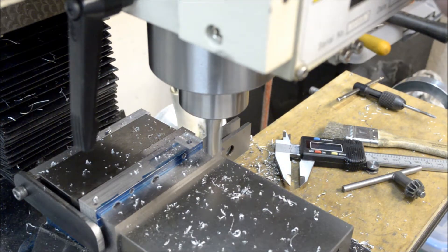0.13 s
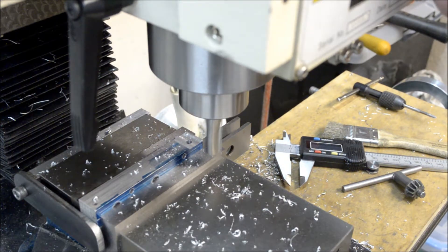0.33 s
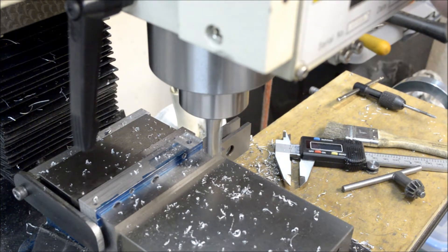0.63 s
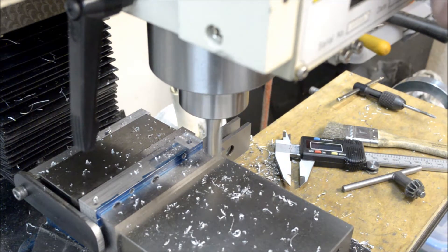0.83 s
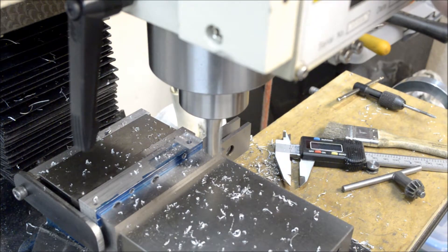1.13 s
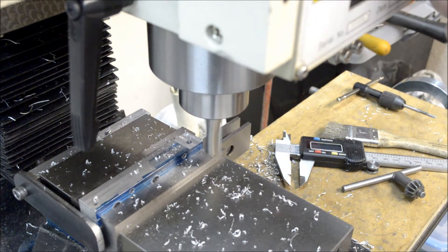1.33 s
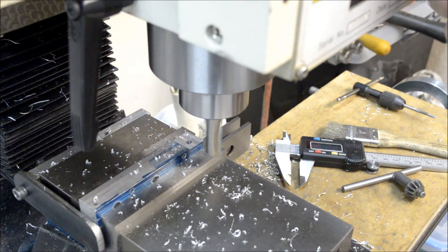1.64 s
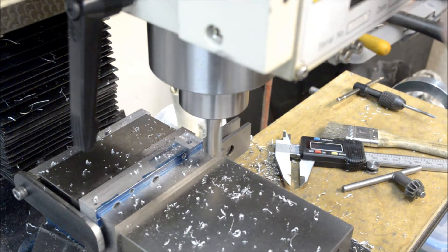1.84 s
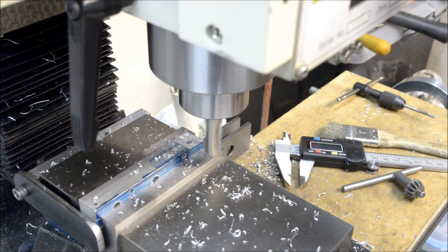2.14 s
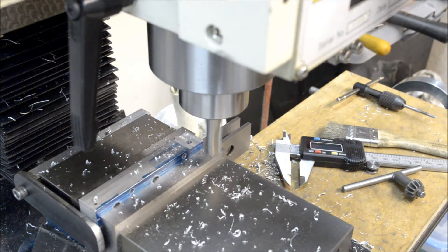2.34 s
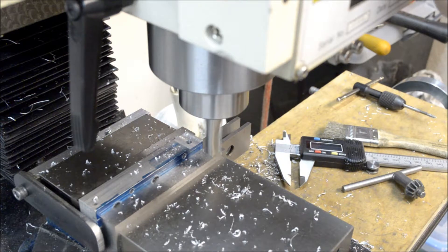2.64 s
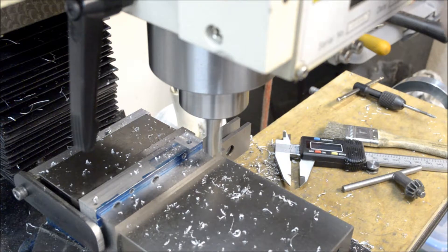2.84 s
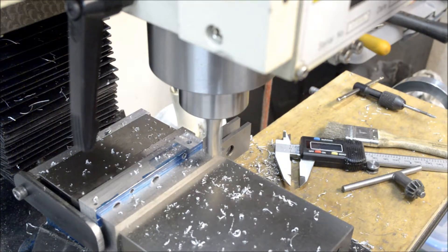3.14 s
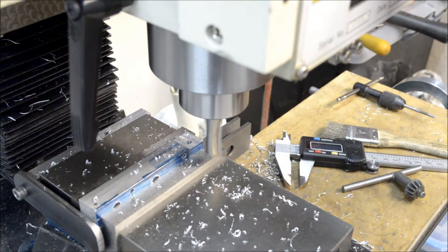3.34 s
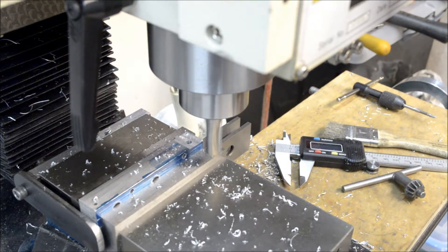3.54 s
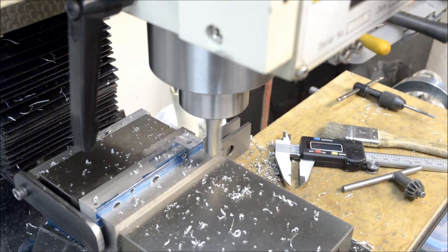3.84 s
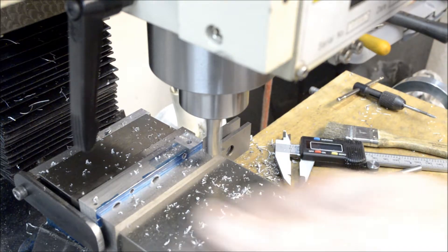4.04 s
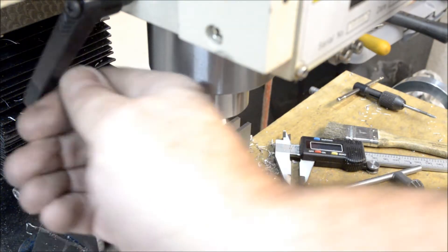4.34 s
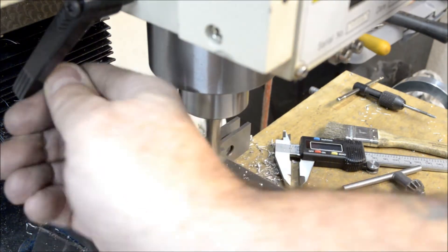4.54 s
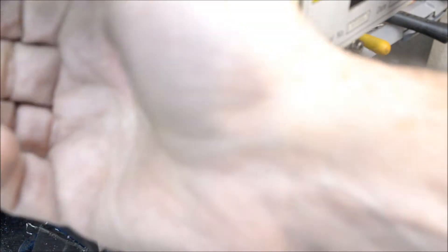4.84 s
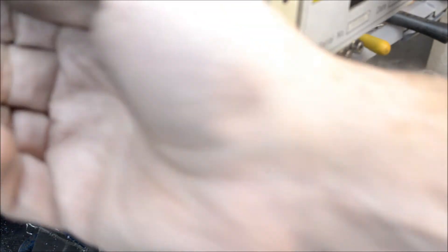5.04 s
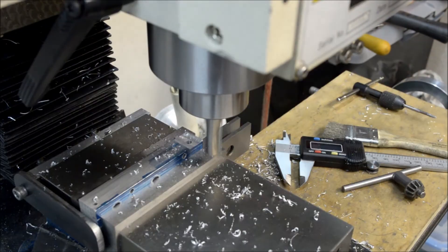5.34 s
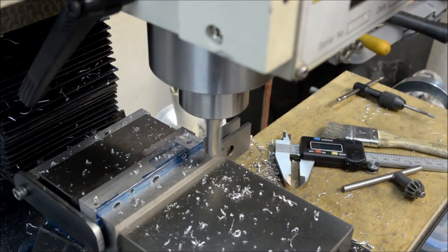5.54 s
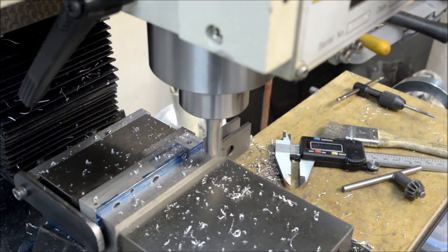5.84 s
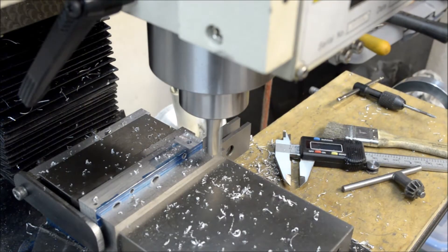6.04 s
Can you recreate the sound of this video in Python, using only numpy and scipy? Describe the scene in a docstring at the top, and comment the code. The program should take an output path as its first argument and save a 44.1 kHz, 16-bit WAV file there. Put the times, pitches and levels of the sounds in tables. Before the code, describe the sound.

Close, continuous gear whine and gritty metal cutting over mains hum, a few sharp clicks, then the spindle speeds up and grows louder.

```python
"""A small geared milling machine cuts a slot in metal, close by, in a workshop.
From the start its gears whine on multiples of the spindle speed over the motor's mains hum, while scraping,
chips and tooth knocks shake the iron head. A pinion chatters and the cutter bites once a turn.
Brief rasps ring narrow bands throughout; before five seconds the first sharp metal ticks ring out.
Just after five seconds the speed is turned up: the gear pitches climb and the cut grows louder."""
import sys
import numpy as np
from scipy import signal
from scipy.fft import rfft, irfft
from scipy.io import wavfile

SR = 44100
rng = np.random.default_rng(int(sys.argv[2]) if len(sys.argv) > 2 else 0)


def dump(signal):
    """Clip the signal to [-1, 1] and save it as 16-bit WAV at the path in sys.argv[1]."""
    limited = np.clip(np.atleast_2d(signal).T, -1, 1)
    pcm = np.round(limited * 32767).astype(np.int16)
    wavfile.write(sys.argv[1], SR, pcm)


N = 272961
TIME = np.arange(N) / SR  # s

# The spindle runs steadily until the knob is turned, then eases toward the new setting
SLOW_TURNS_PER_S, FAST_TURNS_PER_S = 12.537, 14.6
KNOB_S, SPIN_UP_S = 5.03, 0.74  # start and time constant of the rise
LOAD_DB_PER_TURN_PER_S = 1.18  # gears rattle and the cutter bites harder with speed
RUMBLE_TOP_HZ = 450  # the rumble below stays the same at any speed

# The four strongest gear tones: cycles_per_turn
MESH_ORDERS = (62, 59.22, 111, 107)
# Each strong tone swells and fades as its pitch slides through resonances of the head:
# level_db away from them, then a list of (centre_hz, width_hz, lift_db)
MESH_RESONANCES = [(-41.6, [(804, 18, 6), (823, 18, -12), (843, 16, -4.5), (872, 20, 2)]),
                   (-72, [(774, 14, 7), (787, 12, -9), (814, 92, 37.5), (816, 7, -2.5), (828, 11, 2),
                   (839, 6, -2)]), (-49, [(1472, 32, 13), (1500, 11, 9), (1521, 21, 16.5), (1550, 18, 14.5),
                   (1569, 9, 11)]), (-46.7, [(1452, 22, 4.5), (1502, 9, 10.5), (1512, 7, 11)])]
# Backlash makes the strong tones waver: cycles rms, share of level rms
MESH_PHASE_WAVER, MESH_LEVEL_WAVER = .01, .1
# Weaker gear tones and sidebands: cycles_per_turn, slow_db, fast_db (at the highest speed reached)
GEAR_TONES = [(16, -77, -77), (24, -68, -74), (25, -63, -70), (29, -66, -76), (37, -58, -50),
              (45.3, -64, -68), (48.8, -62, -66), (50, -70, -60), (54, -63, -68), (57, -69, -53),
              (60, -58, -58), (63, -50, -52), (63.5, -58, -64), (64.46, -55, -60), (65.3, -55, -58),
              (66.23, -60, -62), (67, -56, -63), (68.22, -55, -62), (68.8, -56, -63), (69.4, -59, -62),
              (70.73, -53, -60), (75, -68, -53), (79, -68, -58), (83.52, -53, -68), (88.82, -54, -63),
              (93, -62, -48), (101, -55, -57), (101.66, -53, -55), (103, -57, -60), (104, -57, -60),
              (106, -54, -55), (109, -55, -62), (110, -52, -55), (112, -64, -50), (116.58, -58, -62),
              (118.43, -48, -53), (120, -49, -58), (120.61, -53, -60), (121, -55, -60), (121.57, -57, -62),
              (122, -56, -61), (124, -59, -56), (125.15, -54, -52), (127, -56, -56), (128.87, -57, -62),
              (134.24, -54, -60), (135.37, -56, -58), (136.12, -54, -62), (138, -51, -52), (147, -55, -53),
              (152.36, -53, -61), (158, -58, -60), (161.5, -57, -60), (220, -57, -56), (226, -56, -55),
              (245, -56, -56), (307.4, -56, -57)]

# Motor hum on multiples of the mains: pitch_hz, level_db
HUM = [(120, -64.5), (240, -72), (360, -67), (480, -59), (1680, -49.5), (1800, -63), (2100, -69),
       (2160, -55)]

# Broad colour of the machine: pitch_hz, level_db (relative)
COLOUR = [(20, -59), (60, -33.5), (110, -35.5), (165, -34), (300, -29.5), (640, -21.5), (900, -13),
          (1150, -19), (1500, -18), (2000, -15), (4700, -20), (6000, -29), (8500, -28), (10000, -42.5),
          (14600, -56.5)]
# Resonances and hollows of head, vice and table: centre_hz, width_hz, lift_db above the broad colour
BODY = [(340, 40, -3), (528, 22, 3), (607, 20, 4), (800, 76, 8), (865, 31, 4.5), (1039, 38, 5),
        (1267, 41, 8), (1363, 120, 9), (1414, 29, -6), (1497, 78, 10), (1589, 52, 5.5), (1713, 64, 6),
        (1780, 40, -3), (1969, 150, 5.8), (2393, 340, -2.5), (2812, 130, 7.5), (2956, 63, 7.5),
        (3073, 48, 6), (3151, 72, 3.3), (3835, 175, 5), (4026, 39, -5), (4089, 195, 3), (4264, 94, -3),
        (5307, 65, -6), (5724, 250, -12), (6379, 120, 4.5), (6892, 112, -13), (7120, 160, 3),
        (8024, 135, 3), (8587, 220, 5), (11800, 1100, 2.5)]

# A small pinion chatters tooth by tooth and binds at one spot: teeth, turns, turns
PINION_TEETH, TIGHT_ANGLE, TIGHT_WIDTH = 14, .89, .2
CHATTER_DB, TIGHT_LIFT_DB, BACKLASH_S = -42, 4.5, .0004  # levels at low speed; timing scatter rms
CHATTER_HZ, CHATTER_WIDTH_HZ = 1520, 650

# Where in each turn the proudest flute enters and drags, and for how long (turns)
ENTRY_ANGLE, DRAG_ANGLE, DRAG_WIDTH = .5, .74, .26
ENTRY_DB, ENTRY_HZ, ENTRY_WIDTH_HZ, ENTRY_T60_S = -57, 7500, 2000, .03  # level at low speed
DRAG_DB, DRAG_HZ, DRAG_WIDTH_HZ = -48, 2946, 700  # level at low speed

# Brief catches of the cutter, and two bursts of gear chatter (1.21 s and 1.35 s): middle_s, peak_rms_db,
# ring_hz
RASPS = [(.061, -38, 2842), (1.21, -39, 1980), (1.268, -39.5, 2870), (1.35, -33, 1360), (1.499, -40, 2900),
         (2.379, -40.5, 2800), (3.89, -37.5, 2836), (5.625, -34.5, 2788), (5.846, -38, 2785),
         (6.06, -39.5, 2770), (6.134, -39, 2800)]
RASP_S, RASP_WIDTH_HZ = .05, 170

# Sharp ticks of metal: start_s, level_db (rms of the first 3 ms), ring_hz, ring_width_hz, t60_s,
# crack_db (bright crack against the ring)
TICKS = [(4.6553, -32, 4450, 1100, .014, -32), (4.6725, -34.5, 4600, 1100, .03, -26),
         (4.688, -39, 4600, 900, .02, -32), (4.8256, -30.5, 6200, 1300, .009, -6),
         (5.7255, -31, 3700, 1500, .06, -15), (5.751, -36, 3700, 1100, .03, -25),
         (5.823, -35, 3900, 1400, .03, -30), (6.0948, -35.5, 9250, 800, .07, -10)]

EDGE_HZ = 14800  # upper limit of the whole sound


def gain_of(db):
    """Logarithmic level: decibels become an amplitude ratio."""
    return 10 ** (np.asarray(db) / 20)


def evened(x):
    """Normalisation: the signal is scaled to rms 1."""
    return x / np.sqrt(np.mean(x ** 2) + 1e-20)


def drift(per_s):
    """Low-pass noise: smooth chance variation of about rms 1, up to the given rate."""
    step = 32  # samples between the slow values
    hz = np.fft.rfftfreq(N // step, step / SR)
    spectrum = rfft(rng.standard_normal(N // step)) / np.sqrt(1 + (hz / per_s) ** 4)
    slow = irfft(spectrum)
    return np.interp(TIME, np.arange(len(slow)) * step / SR, evened(slow))


def lift_db(resonances, hz):
    """Resonance: each bell-shaped peak or hollow adds its decibels at the given pitches."""
    return sum(lift * 2 ** -((2 * (hz - centre) / width) ** 2) for centre, width, lift in resonances)


def band(x, hz, width_hz):
    """Band-pass resonance: one band is kept and rings on after each blow."""
    edges = [max(hz - width_hz / 2, 50), min(hz + width_hz / 2, SR / 2 - 50)]
    return signal.lfilter(*signal.butter(2, edges, "band", fs=SR), x)


def near(turns, angle, width):
    """Periodic window: a bell that reaches 1 whenever the spindle passes the given angle."""
    offset = (turns - angle + .5) % 1 - .5
    return 2 ** -((2 * offset / width) ** 2)


def passes(cycles):
    """Phase crossing: the samples at which a new cycle begins."""
    return np.flatnonzero(np.diff(np.floor(cycles)) > 0)


def ring_body(x):
    """Minimum-phase filtering: a force excites the resonances, which ring on after each blow."""
    size = 8192
    hz = np.fft.rfftfreq(size, 1 / SR)
    points, level = np.transpose(COLOUR)
    db = np.interp(np.log(hz + 1), np.log(points), level) + lift_db(BODY, hz)
    log_gain = np.log(gain_of(np.r_[db, db[-2:0:-1]]))
    # the Hilbert transform of the log gain gives the minimum phase
    response = np.fft.ifft(np.exp(np.conj(signal.hilbert(log_gain)))).real
    return signal.oaconvolve(x, response[:size // 2])[:N]


def spindle_speed():
    """First-order response: steady turns per second, then an exponential approach to a faster setting."""
    eased = 1 - np.exp(-np.maximum(TIME - KNOB_S, 0) / SPIN_UP_S)
    return SLOW_TURNS_PER_S + (FAST_TURNS_PER_S - SLOW_TURNS_PER_S) * eased


def spindle_turns():
    """Integration of speed: the angle of the spindle in turns."""
    return np.cumsum(spindle_speed()) / SR


def load_gain():
    """Load: forces grow with speed, as a gain relative to low speed."""
    return gain_of(LOAD_DB_PER_TURN_PER_S * (spindle_speed() - SLOW_TURNS_PER_S))


def gear_whine(turns):
    """Order locking: meshing tones follow the spindle; backlash makes level and phase waver."""
    speed = spindle_speed()
    fast = ((speed - speed.min()) / np.ptp(speed)) ** 2
    whine = np.zeros(N)
    for order, (db, resonances) in zip(MESH_ORDERS, MESH_RESONANCES):
        phase = order * turns + rng.random() + MESH_PHASE_WAVER * drift(10.0)
        level = gain_of(db + lift_db(resonances, order * speed))
        level = level * (1 + MESH_LEVEL_WAVER * drift(30))
        whine += level * np.cos(2 * np.pi * phase)
    for order, slow_db, fast_db in GEAR_TONES:
        phase = order * turns + rng.random() + .035 * drift(4)
        level = gain_of(slow_db + fast * (fast_db - slow_db)) * (1 + .15 * drift(10))
        whine += level * np.cos(2 * np.pi * phase)
    return np.sqrt(2) * whine  # makes the levels rms


def motor_hum(waver=0.12):
    """Mains harmonics: the rectified supply makes the motor buzz at pitches that ignore its speed."""
    hum = np.zeros(N)
    for hz, db in HUM:
        level = gain_of(db) * (1 + waver * drift(3.2))
        hum += level * np.cos(2 * np.pi * (hz * TIME + rng.random()))
    return np.sqrt(2) * hum  # makes the levels rms


def tooth_knocks(turns, count=900, uneven=0.28, top_hz=1200):
    """Cyclic impacts: tooth flaws knock at the same angles every turn, never quite equally hard."""
    place = (np.arange(count) + rng.random(count)) / count
    sign = rng.choice([-1, 1], count)
    angles = np.arange(int(turns[-1]) + 1)[:, None] + place
    force = sign * (1 + uneven * rng.standard_normal(angles.shape))
    within = angles < turns[-1]
    knocks = np.bincount(np.searchsorted(turns, angles[within]), force[within], N)
    return evened(signal.lfilter(*signal.butter(1, top_hz, fs=SR), knocks))


def cutting(turns, level_db=-33.5, chip_db=-5, chips_per_s=2400, unrest_db=0.41):
    """Forced vibration: scraping, breaking chips and tooth knocks shake the machine; load spares the rumble."""
    scrape = rng.standard_normal(N)
    breaks = rng.standard_normal(N) * (rng.random(N) < chips_per_s / SR)
    chips = gain_of(chip_db) * evened(breaks)
    knocks = gain_of(-10.5) * tooth_knocks(turns)
    force = (scrape + chips + knocks) * gain_of(unrest_db * drift(22))
    shaken = evened(ring_body(force))
    rumble = signal.sosfiltfilt(signal.butter(2, RUMBLE_TOP_HZ, fs=SR, output="sos"), shaken)
    return gain_of(level_db) * (rumble + load_gain() * (shaken - rumble))


def pinion_chatter(turns, uneven=0.25):
    """Impact excitation: pinion teeth strike the head, a little early or late, hardest at the tight spot."""
    at = passes(PINION_TEETH * turns - .5)
    late, hard = rng.standard_normal((len(at), 2)).T
    tightness = near(turns[at], TIGHT_ANGLE, TIGHT_WIDTH)
    force = gain_of(TIGHT_LIFT_DB * tightness) * (1 + uneven * hard)
    struck = at + np.round(late * BACKLASH_S * SR).astype(int)
    blows = np.bincount(np.clip(struck, 0, N - 1), force, N)
    chatter = evened(ring_body(band(blows, CHATTER_HZ, CHATTER_WIDTH_HZ)))
    return gain_of(CHATTER_DB) * load_gain() * chatter


def cutter_bites(turns, uneven_db=1):
    """Periodic friction: once a turn the proudest flute clicks into the metal, then drags through it."""
    entry = np.zeros(N)
    entry[passes(turns - ENTRY_ANGLE)] = 1
    contact = signal.lfilter([1], [1, -np.exp(-np.log(1000) / (ENTRY_T60_S * SR))], entry)
    hiss = evened(band(rng.standard_normal(N), ENTRY_HZ, ENTRY_WIDTH_HZ))
    click = gain_of(ENTRY_DB) * contact * hiss
    scrape = rng.standard_normal(N) * near(turns, DRAG_ANGLE, DRAG_WIDTH)
    scrape = scrape * gain_of(uneven_db * drift(7.5))
    drag = gain_of(DRAG_DB) * evened(ring_body(band(scrape, DRAG_HZ, DRAG_WIDTH_HZ)))
    return load_gain() * (click + drag)


def rasps():
    """Friction at resonance: a tooth drags on a chip, or the gears chatter briefly, and a swell of scraping
    rings one narrow band."""
    out = np.zeros(N)
    swell = np.hanning(round(RASP_S * SR))
    hz = np.fft.rfftfreq(len(swell), 1 / SR)
    for middle_s, db, ring_hz in RASPS:
        scrape = rfft(rng.standard_normal(len(swell)))
        ring = 1 / (1 + 2j * (hz - ring_hz) / RASP_WIDTH_HZ) ** 2
        rasp = gain_of(db) * swell * evened(irfft(scrape * ring, len(swell)))
        part = out[round((middle_s - RASP_S / 2) * SR):][:len(swell)]
        part += rasp[:len(part)]
    return out


def ticks():
    """Damped impact: a short burst of contact cracks brightly and rings one band of the metal."""
    out = np.zeros(N)
    t = np.arange(SR // 4) / SR
    hz = np.fft.rfftfreq(len(t), 1 / SR)
    crack_hz = [1500, 4500, 8700, 10000, 12000, 13000, 15000]
    crack = gain_of(np.interp(hz, crack_hz, [-20, -1, 0, -10, -11, -20, -28]))
    for start_s, db, ring_hz, width_hz, t60_s, crack_db in TICKS:
        decay = np.minimum(t / .0004, 1) * np.exp(-np.log(1000) * t / t60_s)
        contact = rng.standard_normal(len(t)) * decay
        ring = 1 / (1 + 2j * (hz - ring_hz) / width_hz) ** 2
        # powers of crack and ring add; the phase is the ring's
        colour = np.hypot(gain_of(crack_db) * crack, abs(ring)) * np.exp(1j * np.angle(ring))
        tick = irfft(rfft(contact) * colour, len(t))
        tick *= gain_of(db) / np.std(tick[t < .003])
        part = out[round(start_s * SR):][:len(t)]
        part += tick[:len(part)]
    return out


def scene():
    """Superposition: all sources of the machine add, alike in both channels."""
    turns = spindle_turns()
    machine = gear_whine(turns) + motor_hum() + cutting(turns)
    machine += pinion_chatter(turns) + cutter_bites(turns)
    machine += rasps() + ticks()
    return np.array([machine, machine])


def record(dry):
    """Band limitation: a linear-phase low-pass removes what lies above the upper limit."""
    low_pass = signal.firwin(255, EDGE_HZ, window=("kaiser", 9), fs=SR)
    return signal.oaconvolve(dry, low_pass[None], "same")


dry = scene()
out = record(dry)
dump(out)
```